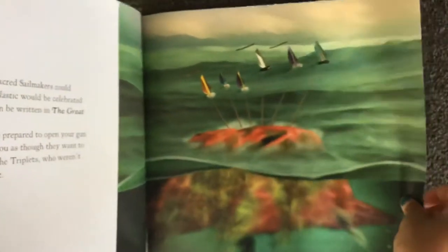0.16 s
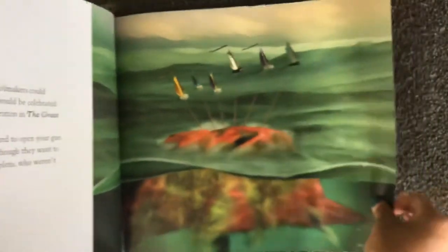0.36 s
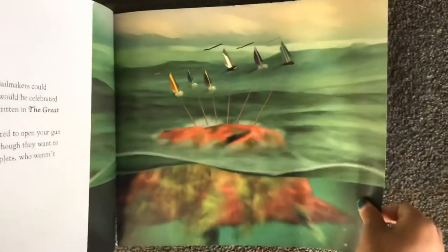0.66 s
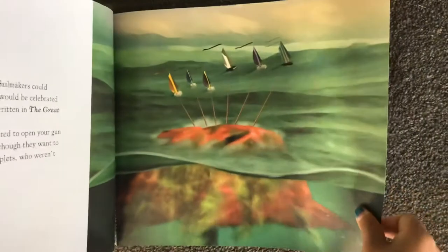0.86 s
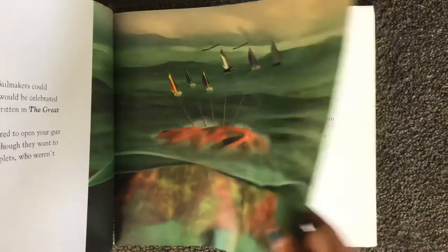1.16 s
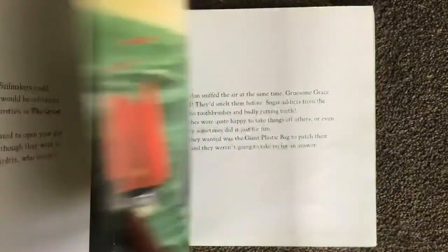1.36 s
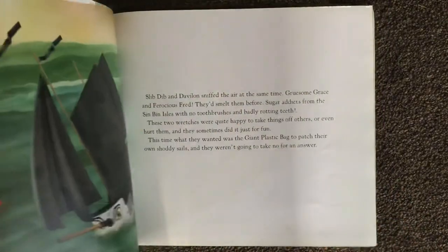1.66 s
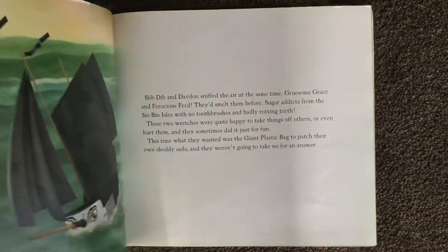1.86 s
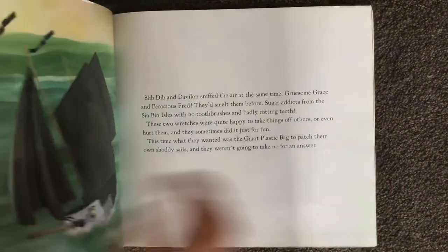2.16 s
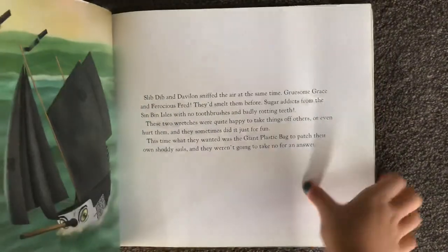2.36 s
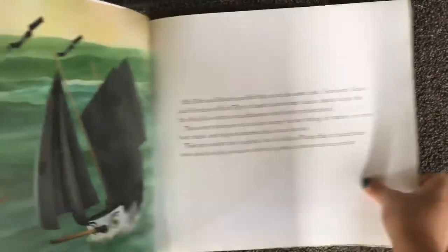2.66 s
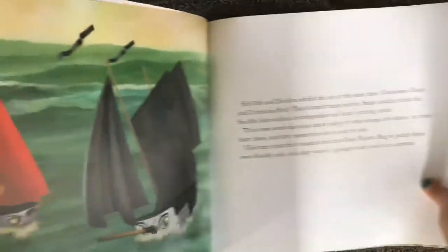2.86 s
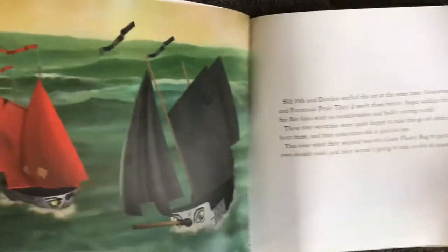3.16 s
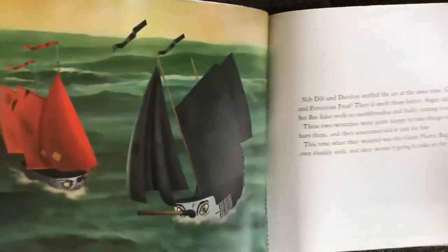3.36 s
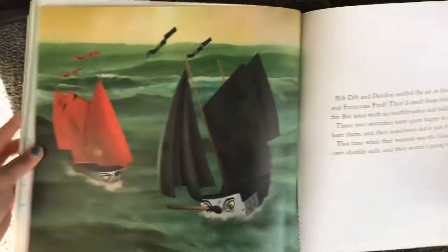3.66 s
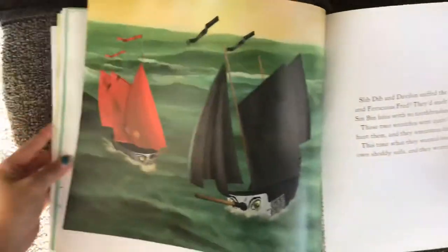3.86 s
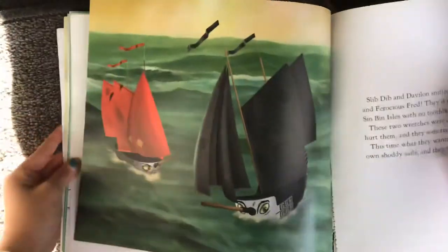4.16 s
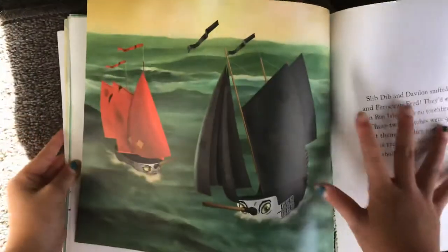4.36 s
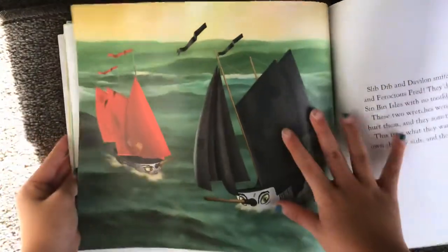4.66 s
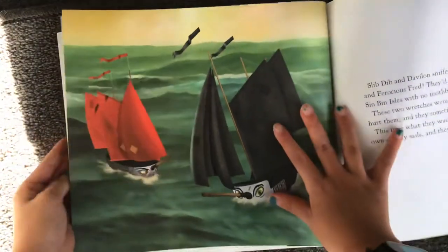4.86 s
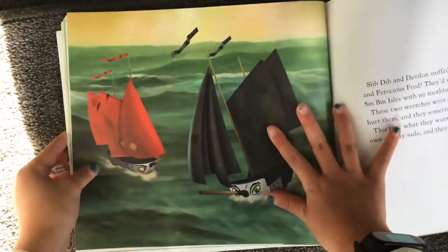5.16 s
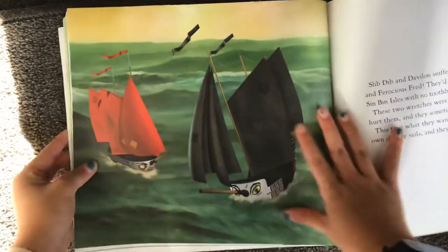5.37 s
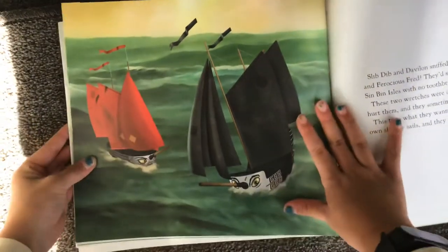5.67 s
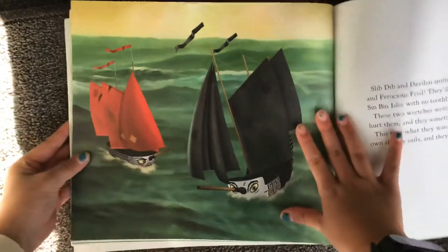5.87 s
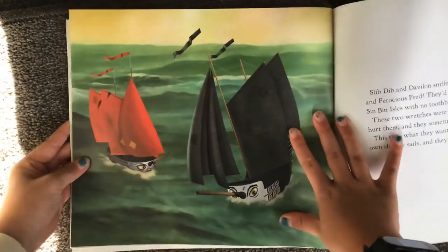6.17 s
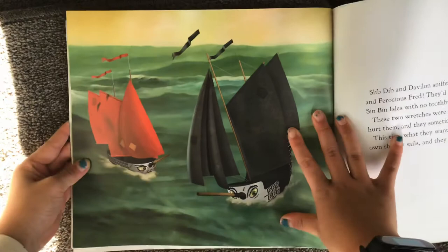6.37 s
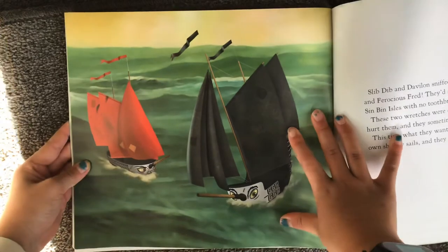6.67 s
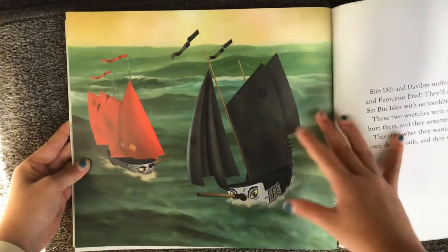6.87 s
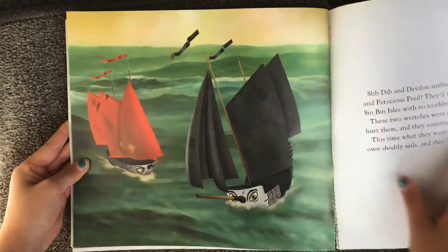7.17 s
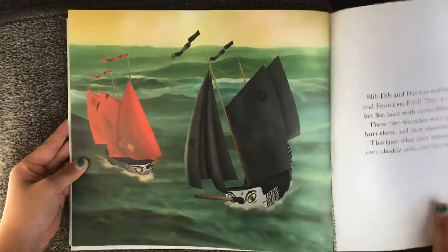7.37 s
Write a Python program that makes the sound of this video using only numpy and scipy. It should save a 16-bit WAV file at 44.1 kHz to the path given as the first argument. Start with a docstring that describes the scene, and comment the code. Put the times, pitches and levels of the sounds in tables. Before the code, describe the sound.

Close by in a quiet room, a fingertip drags up the corner of a glossy book page with small gritty squeaks. The stiff sheet creaks, crackles, snaps over and lands softly. The large book then slides over carpet with a faint grainy hiss and a few dull bumps. A palm presses and smooths the page with brief creaks and swishes, ending in light taps.

```python
"""A large picture-book page buckles, snaps over and lands, close by, on a carpet in a quiet room.
A finger drags the glossy corner up in stick-slip squeaks and creaks. Each slip or snap is a pulse
coloured by the sheet's resonances; snaps also thud the stack of pages below.
The book is then slid along the carpet, gripped, and smoothed flat by a palm:
grainy friction noise in strokes that swell, hold and stop."""
import sys
import numpy as np
from scipy import signal
from scipy.fft import rfft, irfft, next_fast_len
from scipy.io import wavfile
from scipy.ndimage import uniform_filter1d

SR = 44100
rng = np.random.default_rng(int(sys.argv[2]) if len(sys.argv) > 2 else 0)


def master_out(mix):
    """Clip the mix to full scale and print it as 16-bit PCM to the path in sys.argv[1]."""
    frames = np.transpose(np.atleast_2d(mix))
    ceiling = np.clip(frames, -1, 1)
    pcm = np.round(ceiling * 32767).astype(np.int16)
    wavfile.write(sys.argv[1], SR, pcm)


N = 332073
FFT_SIZE = 8192
TIME_S = np.arange(N) / SR
BIN_HZ = np.maximum(np.fft.rfftfreq(FFT_SIZE, 1 / SR), 1)
LEAD_S = 0.006   # build-up ahead of each pulse
LANDING_S = 1.62   # the turned page comes to rest


def from_db(db):
    """Decibels to gain."""
    return 10 ** (np.asarray(db) / 20)


def unit_rms(x):
    """Scale to rms 1."""
    return x / np.sqrt(np.mean(x ** 2) + 1e-20)


def unit_energy(x):
    """Scale to energy 1."""
    return x / np.sqrt(np.sum(x ** 2) + 1e-20)


def spectrum_db(points, hz=BIN_HZ):
    """Interpolate (freq_hz, gain_db) points over log frequency."""
    freq_hz, gain_db = np.transpose(points)
    return np.interp(np.log(np.maximum(hz, 1)), np.log(freq_hz), gain_db)


def resonance_db(centre_hz, q):
    """Spectrum of one damped resonance."""
    return -10 * np.log10(1 + q ** 2 * (BIN_HZ / centre_hz - centre_hz / BIN_HZ) ** 2)


def coloured(x, spectrum):
    """Filter by a spectrum; rms 1."""
    size = next_fast_len(N)
    gain = from_db(spectrum_db(spectrum, np.fft.rfftfreq(size, 1 / SR)))
    return unit_rms(irfft(rfft(x, size) * gain, size)[:N])


def drift(rate_hz):
    """Ramps between unit-normal random values."""
    return np.interp(TIME_S * rate_hz, np.arange(FFT_SIZE), rng.standard_normal(FFT_SIZE))


def add(out, start_s, sound):
    """Mix a sound in at start_s."""
    at = max(round(start_s * SR), 0)
    out[at:at + len(sound)] += sound[:max(N - at, 0)]


# Room air: freq_hz, gain_db
AIR_SPECTRUM = [(15, -66), (25, -44.5), (53, -2.5), (74, 2), (114, -9.5), (145, -12.5), (285, -22.5),
                (476, -33), (695, -25.5), (1160, -30), (2990, -33), (3430, -37), (5570, -38), (16000, -56)]

def room_air(level_db=-71.5):
    """Still air: steady, low noise."""
    return from_db(level_db) * coloured(rng.standard_normal(N), AIR_SPECTRUM)


def room(x, wet_db=-31.0, t60_s=0.52, predelay_s=0.004):
    """Add the carpeted room's faint, short tail."""
    t = TIME_S[:2 * FFT_SIZE]
    tail = rng.standard_normal(len(t)) * from_db(-60 * t / t60_s) * (t > predelay_s)
    tail = signal.sosfilt(signal.butter(1, 6000, fs=SR, output="sos"), tail)
    return x + from_db(wet_db) * signal.fftconvolve(x, unit_energy(tail))[:N]


def friction(spectrum, grain_db, flutter_db):
    """Tiny fibre contacts of uneven size under wavering pressure."""
    grains = rng.standard_normal(N) * from_db(grain_db * np.minimum(rng.exponential(1, N), 5))
    return coloured(grains, spectrum) * from_db(flutter_db * drift(70))


def stroke(start_s, length_s, attack_s=0.012, release_s=0.014):
    """Speed of one stroke: attack, hold, release."""
    attack = (1 + np.tanh((TIME_S - start_s) / (2 * attack_s))) / 2
    release = (1 - np.tanh((TIME_S - start_s - length_s) / (2 * release_s))) / 2
    return attack * release


# Rumble envelope, before trim: time_s, level_db
FLEX_LEVELS = [(0.0, -59.5), (0.48, -70.5), (0.84, -67.5), (1.01, -67), (1.38, -69.5), (2.03, -75),
               (2.98, -61), (3.63, -68), (4.07, -65.5), (4.28, -68.5), (5.98, -66.5), (6.31, -70.5),
               (6.71, -77), (7.53, -69.5)]
# Rumble colour: freq_hz, gain_db
FLEX_SPECTRUM = [(50, -31.5), (100, 2.5), (160, 0), (280, 1.5), (450, -3), (700, -11.5), (1400, -32.5)]

def book_flex(trim_db=-0.5):
    """The book rumbles as it flexes in the hands."""
    level_db = np.interp(TIME_S, *np.transpose(FLEX_LEVELS))
    return from_db(level_db + trim_db) * friction(FLEX_SPECTRUM, grain_db=4.5, flutter_db=3.5)


# Lifts and grips, before trim: start_s, length_s, level_db
LIFT_STROKES = [(-0.003, 0.056, -47), (0.06, 0.31, -54), (0.415, 0.15, -58), (.55, 0.083, -59.5),
                (0.756, 0.2, -62), (0.82, 0.073, -56), (1.11, 0.068, -66.5), (1.255, 0.039, -62.5),
                (1.329, 0.14, -69.5)]
# Paper on paper: freq_hz, gain_db
LIFT_SPECTRUM = [(200, -27.5), (550, -12.5), (950, -6.5), (1350, -13.5), (1750, 0.5), (2300, -2),
                 (2900, -2.5), (3450, -11), (3900, -10.5), (4350, -14.5), (5100, -9.5), (5800, -15),
                 (7200, -21.5), (8100, -18.5), (8900, -18), (9400, -27.5), (11500, -24), (16000, -26.5)]

def sheet_lift(trim_db=-4.0):
    """Sheet whispers over sheet as it is lifted or gripped."""
    envelope = sum(from_db(db) * stroke(start_s, length_s) for start_s, length_s, db in LIFT_STROKES)
    return from_db(trim_db) * envelope * friction(LIFT_SPECTRUM, grain_db=5.0, flutter_db=3.0)


# Hand strokes and the push over the carpet, before trim: start_s, length_s, drag_db, swish_db, hiss_db
RUB_STROKES = [(1.774, 0.1, -64.5, -68.5, -83), (1.892, 0.16, -72, -64.5, -81),
               (2.081, 0.17, -61.5, -60, -80), (2.293, 0.15, -60.5, -58, -78), (2.494, 0.16, -57, -68, -74),
               (2.71, 0.31, -58.5, -62.5, -62.5), (3.012, 0.47, -58, -63.5, -63.5),
               (3.481, 0.71, -57.5, -63.5, -63.5), (4.24, 0.12, -67, -63.5, -72),
               (4.38, 0.2, -67.5, -71, -76.5), (4.63, 0.075, -60, -63, -73), (4.694, 0.13, -61.5, -66, -85),
               (4.865, 0.18, -64, -62.5, -81), (5.03, 0.28, -72, -72.5, -92),
               (5.511, 0.26, -68, -66, -69.5), (5.902, 0.071, -68.5, -66, -84),
               (5.966, 0.16, -64, -60, -68.5), (6.231, 0.16, -79, -77, -83),
               (6.985, 0.4, -84, -75.5, -76.5), (7.473, 0.089, -81, -70.5, -76)]
# Resting hands, before trim: drag_db, swish_db, hiss_db
RUB_FLOOR_DB = [-84.5, -79.5, -87.5]
# Cover drag, skin swish, fibre hiss: freq_hz, gain_db
DRAG_SPECTRUM = [(150, -7.5), (300, 0), (450, 0.5), (700, -3.5), (950, 1), (1600, -3.5), (2400, -7.5),
                 (4000, -20), (9000, -41)]
SWISH_SPECTRUM = [(700, -27.5), (1400, -6), (2000, -3), (3000, 0.5), (3800, -2.5), (4800, -1), (5600, -8),
                  (9000, -13.5), (16000, -23.5)]
HISS_SPECTRUM = [(3000, -31), (5500, -4), (7000, -2), (8500, 0), (10500, -4.5), (13000, -4), (16000, -6.5)]

def rubbing(drag_trim_db=-3.5, swish_trim_db=-3.0, waver_db=0.19):
    """The cover drags on the carpet, skin swishes over the page, fibres hiss."""
    strokes = sum(np.outer(from_db(levels_db), stroke(start_s, length_s))
                  for start_s, length_s, *levels_db in RUB_STROKES)
    strokes *= from_db(waver_db * drift(9))
    drag, swish, hiss = np.hypot(strokes, from_db(RUB_FLOOR_DB)[:, None])
    cover = from_db(drag_trim_db) * drag * friction(DRAG_SPECTRUM, grain_db=4.5, flutter_db=2.0)
    skin = from_db(swish_trim_db) * swish * friction(SWISH_SPECTRUM, grain_db=3.0, flutter_db=2.5)
    fibres = hiss * friction(HISS_SPECTRUM, grain_db=1.0, flutter_db=1.0)
    return cover + skin + fibres


# Light strokes on the gloss, silent past end_s: start_s, fastest_s, end_s, level_db, centre_hz, q
SKIM_STROKES = [(-.02, .04, .16, -54.5, 2850, 7), (0.417, 0.474, 0.59, -68.5, 5100, 6.9),
                (6.99, 7.135, 6.4, -74.5, 2920, 10), (2.704, 2.802, 2.9, -54, 13700, 1.5),
                (2.99, 3.04, 3.4, -59, 14800, 1.2), (3.3, 4.1, 4.185, -63, 8500, 2.2),
                (3.2, 4.08, 3.7, -64.5, 14800, 4), (3.503, 3.87, 3.96, -65, 1680, 4.4),
                (3.818, 3.85, 3.96, -59, 4550, 11), (4.25, 4.373, 4.4, -62.5, 11200, 3.4),
                (4.22, 4.29, 4.38, -63, 4500, 6), (7.09, 7.147, 7.27, -68, 13700, 3)]

def finger_skims():
    """A skimming finger gives a band of noise that follows its speed."""
    out = np.zeros(N)
    for start_s, fastest_s, end_s, level_db, centre_hz, q in SKIM_STROKES:
        speed = np.sin(np.pi / 2 * np.interp(TIME_S, [start_s, fastest_s, end_s], [0, 1, 0]))
        band = np.column_stack([BIN_HZ, resonance_db(centre_hz, q)])
        out += from_db(level_db) * speed * friction(band, grain_db=2.5, flutter_db=1.5)
    return out


# Squeal: start_s, end_s, first_hz, last_hz, level_db
SQUEAL = (1.914, 1.953, 885, 965, -56)
# Harmonics 1-5: gain_db
SQUEAL_HARMONICS_DB = [-3.5, -14, -3, 0, -10]

def squeal(waver_share=0.022):
    """A contact's quick slips lock into a short, rising, hoarse tone."""
    start_s, end_s, first_hz, last_hz, level_db = SQUEAL
    glide_hz = np.interp(TIME_S, [start_s, end_s], [first_hz, last_hz])
    pitch_hz = glide_hz * (1 + waver_share * drift(500))
    phase = 2 * np.pi * np.cumsum(pitch_hz) / SR
    tone = sum(from_db(db) * np.sin(k * phase) for k, db in enumerate(SQUEAL_HARMONICS_DB, 1))
    envelope = np.sin(np.pi * np.interp(TIME_S, [start_s, end_s], [0, 1]))
    return from_db(level_db) * envelope * unit_rms(tone)


def blow(colour_db, ring_db, t60_s, give_db, give_s, ripple_hz, swell_s=0.00078):
    """Paper gives, lets go in one pulse and rings densely; energy of 5 ms at rms 1."""
    # Broad colour swells into the pulse; narrow peaks ring after it.
    cepstrum = irfft(np.log(from_db(colour_db)))
    cepstrum *= 1 + np.tanh(np.fft.fftfreq(FFT_SIZE) * FFT_SIZE / SR / swell_s)
    t = TIME_S[:FFT_SIZE] - LEAD_S
    give_noise, ring_noise = rng.standard_normal((2, FFT_SIZE))
    waves = from_db(give_db) * unit_energy(give_noise * np.exp(-np.abs(t) / give_s))
    waves += from_db(ring_db) * unit_energy(ring_noise * (t > 0) * from_db(-60 * t / t60_s))
    waves[np.searchsorted(t, 0)] = 1   # the pulse
    # Whiten: reflections add only fine ripples to the contact's colour.
    ripples = rfft(waves)
    ripples /= np.sqrt(uniform_filter1d(np.abs(ripples) ** 2, int(ripple_hz * FFT_SIZE / SR) + 1))
    sound = irfft(np.exp(rfft(cepstrum)) * ripples)[:FFT_SIZE // 2]
    return unit_energy(sound) * np.sqrt(0.005 * SR)


def thud(centre_hz, t60_s, q, skirt_db, ring_db):
    """The page stack answers a soft blow with one broad, damped resonance."""
    soft_contact_db = skirt_db * np.log10(1 + (BIN_HZ / (3 * centre_hz)) ** 2)
    colour_db = resonance_db(centre_hz, q) + soft_contact_db
    return blow(colour_db, ring_db, t60_s, give_db=2.0, give_s=0.001, ripple_hz=250)


# Soft blows on the book: start_s, level_db, centre_hz, t60_s
SOFT_BLOWS = [(.566, -39, 235, 0.13), (.584, -47, 120, 0.2), (.967, -42, 200, 0.12),
              (1.125, -36, 171, 0.086), (1.141, -41.5, 120, 0.15), (1.6255, -43.5, 1316, 0.029),
              (1.628, -41, 636, 0.077), (2.087, -45, 127, 0.13), (2.793, -53, 440, 0.08),
              (3.699, -51.5, 654, 0.021), (3.981, -53.5, 900, 0.018), (4.176, -37, 305, 0.065),
              (4.924, -48, 340, 0.23), (4.977, -45, 473, 0.051), (5.35, -52.5, 330, 0.064),
              (5.5, -55, 119, 0.06), (5.588, -52, 100, 0.083), (6.099, -49, 299, 0.089),
              (7.12, -59, 1159, 0.04), (7.128, -46, 278, 0.13)]

def thumps():
    """Fingers, palm and the landing page thud without a crack."""
    out = np.zeros(N)
    for start_s, level_db, centre_hz, t60_s in SOFT_BLOWS:
        thump = thud(centre_hz, t60_s, q=1.9, skirt_db=-36.5, ring_db=4.0)
        add(out, start_s - LEAD_S, from_db(level_db) * thump)
    return out


# One slip of the stiff sheet: freq_hz, gain_db
PAPER_SPECTRUM = [(40, -37.5), (80, -19), (200, -19), (550, -15.5), (950, -13.5), (1350, -13.5), (1620, 2),
                  (1850, 3.5), (2750, -3.5), (3500, -9), (4600, -11.5), (6200, -21.5), (9000, -29),
                  (16000, -34.5)]
# Sheet resonance through the turn: time_s, main_hz, clearness_share
SHEET_TRACK = [(0, 1760, 0), (.75, 1796, 0.53), (.89, 1654, 1), (.97, 1620, 0.93), (1.13, 1580, 1),
               (1.7, 1590, 0.11), (7.53, 1587, 0)]
# Peaks and hollows of the free sheet: ratio_to_main, gain_db
FREE_MODES = [(.33, 4), (.68, -6.5), (1.03, 2.5), (1.72, -10), (2.15, 4), (2.6, -6.5), (2.97, 7.5),
              (3.42, -5), (3.85, 7.5), (5, 7.5), (5.6, 2)]

def paper_colour_db(time_s, body_db, treble_db, mode_width_share=0.092):
    """Broad contacts add body, sharp ones treble; a freer sheet rings lower and clearer."""
    times_s, track_hz, clearness = np.transpose(SHEET_TRACK)
    main_hz = np.interp(time_s, times_s, track_hz)
    shifted_hz = BIN_HZ * track_hz[0] / main_hz
    contact = [(90, body_db / 2), (300, body_db), (1150, body_db), (1700, 0.012), (2400, 0.0023),
               (5500, treble_db), (14000, 1.215 * treble_db)]
    modes_db = sum(db * np.exp(-(np.log(BIN_HZ / (ratio * main_hz)) / mode_width_share) ** 2)
                   for ratio, db in FREE_MODES)
    modes_db *= np.interp(time_s, times_s, clearness)
    return spectrum_db(PAPER_SPECTRUM, shifted_hz) + spectrum_db(contact, shifted_hz) + modes_db


def disperse(sound, travel_s):
    """Bending waves carry lows more slowly; travel_s is at 1 kHz, and 2 kHz stays on time."""
    phase = 2 * np.pi * travel_s * (2 * np.sqrt(1000 * BIN_HZ) - BIN_HZ / np.sqrt(2))
    return irfft(rfft(sound, FFT_SIZE) * np.exp(-1j * phase))[:len(sound)]


def slip_force(period_s, scrape, cycle_share=0.31, longest_s=0.0022, reference_s=0.0059):
    """A slip lasts a share of its cycle: quick ones pluck cleanly, slow ones may scrape."""
    t = TIME_S[:FFT_SIZE // 16]
    slip_s = min(cycle_share * period_s, longest_s)
    grit = rng.standard_normal(len(t)) * np.exp(-(t / slip_s) ** 2)
    force = scrape * (period_s / reference_s) ** 2 * unit_energy(grit)
    force[0] = 1
    return force


def stick_slip(pluck, start_s, end_s, rates_hz, levels_db, scrape, jitter_share, uneven_db):
    """Nearly regular slips pluck the sheet; rate and level ramp from first to last."""
    out, time_s = np.zeros(N), start_s
    while time_s <= end_s:
        period_s = 1 / np.interp(time_s, [start_s, end_s], rates_hz)
        level_db = np.interp(time_s, [start_s, end_s], levels_db) + uneven_db * rng.standard_normal()
        scraped = np.convolve(pluck, slip_force(period_s, scrape))
        slip = unit_energy(scraped) * np.linalg.norm(pluck)   # same energy, spread out
        add(out, time_s - LEAD_S, from_db(level_db) * slip)
        time_s += period_s * np.exp(jitter_share * rng.standard_normal())
    return out


# Slow slip runs:
# start_s, end_s, first_rate_hz, last_rate_hz, first_db, last_db, body_db, treble_db, scrape_gain
CREAK_RUNS = [(.5515, 0.573, 155, 130, -58, -59, 7, -13, 0),
              (0.591, 0.618, 260, 170, -51.5, -56, 6, 0, 0.2),
              (0.7555, 0.79, 163, 190, -56, -57, 2, -15, 0.14),
              (0.798, 0.834, 360, 230, -63, -54, 7, -9, 0.2),
              (0.8383, 0.896, 278, 175, -48, -47.5, 8.5, 0.5, .1),
              (2.372, 2.429, 164, 120, -56.5, -63, 5, 10, 0.74),
              (2.441, 2.494, 101, 86, -53.5, -47, 9, 11.5, .5),
              (2.5028, 2.539, 126, 99, -42.5, -40.5, 11.5, 7, 0.4),
              (2.5508, 2.591, 87, 63, -43, -50, 15, 9, 0.5),
              (5.342, 5.417, 64, 32, -66.5, -65.5, 12, 19, 0.22),
              (5.472, 5.537, 140, 190, -64.5, -48.5, 26, 15, 0.52),
              (5.547, 5.602, 71, 79, -49, -46, 24.5, 9, 0.14)]
# Palm contact, added to the paper colour: freq_hz, gain_db
PALM_SPECTRUM = [(150, -1), (480, 3.5), (850, -2), (1500, 1), (1950, -3), (3000, 1), (5200, -3),
                 (6300, -5.5), (9000, -1.5)]

def slow_creaks():
    """Slow slip runs judder: first the lifted sheet's corner ticks, later a hard-pressed thumb and palm judder
    over the page; each slip disperses into a falling chirp."""
    out = np.zeros(N)
    for start_s, end_s, *rates_hz, first_db, last_db, body_db, treble_db, scrape in CREAK_RUNS:
        colour_db = paper_colour_db(start_s, body_db, treble_db) + spectrum_db(PALM_SPECTRUM)
        pluck = blow(colour_db, ring_db=-13.5 + 22 * scrape, t60_s=0.024,
                     give_db=-9, give_s=0.00016, ripple_hz=508)
        pluck = disperse(pluck, travel_s=0.0014)
        out += stick_slip(pluck, start_s, end_s, rates_hz, [first_db, last_db], scrape,
                          jitter_share=0.016, uneven_db=1.0)
    return out


# Quick slip runs: start_s, end_s, first_rate_hz, last_rate_hz, level_db, body_db, treble_db
SQUEAK_RUNS = [(0.04, 0.045, 670, 500, -46, -3, -0.5), (0.052, 0.06, 720, 640, -45, 5, 0),
               (.071, 0.092, 520, 410, -44, 6.5, 1), (0.1007, 0.1183, 520, 600, -40, 4.5, -1),
               (0.13, 0.144, 720, 500, -39, 6, 0.5), (0.17, 0.1776, 570, 410, -36.5, 3.5, 0.5),
               (0.1938, .2062, 440, 375, -40.5, 3, -2), (0.2165, 0.2332, 605, 380, -40, 5, 0.5),
               (0.237, 0.2457, 420, 440, -40, 6, -1), (0.252, 0.271, 560, 470, -42, 3.5, 0.5),
               (0.279, 0.297, 430, 510, -46, 3, 0), (0.311, 0.323, 600, 440, -54, 4, -2),
               (2.788, 2.802, 460, 415, -51, 24.5, 11), (3.825, 3.84, 550, 530, -53, 12, 12),
               (3.842, 3.853, 560, 370, -45, 12, 6)]
# Fingertip contact, added to the paper colour: freq_hz, gain_db
FINGERTIP_SPECTRUM = [(200, 0), (700, 1), (1000, 2), (1330, -5), (1550, 3.5), (1900, 0.5), (2900, 4),
                      (3500, -3), (3950, 1.5), (4600, 3.5), (5600, 1), (6400, 0.5), (7800, -1.5),
                      (8800, 8.5), (9900, -2), (11400, 3), (14000, 0)]

def finger_squeaks(fade_db=1.0):
    """A fingertip breaks loose on the gloss, slips in gritty plucks and sticks again."""
    out = np.zeros(N)
    for start_s, end_s, *rates_hz, level_db, body_db, treble_db in SQUEAK_RUNS:
        colour_db = paper_colour_db(start_s, body_db, treble_db) + spectrum_db(FINGERTIP_SPECTRUM)
        pluck = blow(colour_db, ring_db=-10, t60_s=0.021, give_db=-11.5, give_s=0.0001, ripple_hz=1100)
        pluck = disperse(pluck, travel_s=0.00061)
        levels_db = [level_db + fade_db / 2, level_db - fade_db / 2]
        out += stick_slip(pluck, start_s, end_s, rates_hz, levels_db,
                          scrape=2.1, jitter_share=0.08, uneven_db=2.3)
    return out


def crack(time_s, body_db, treble_db):
    """One sharp release of the paper: clean while it hangs free, buzzing once on the stack."""
    buzz_db = 7.5 * (time_s > LANDING_S)
    pulse = blow(paper_colour_db(time_s, body_db, treble_db), ring_db=-6 + buzz_db, t60_s=0.018,
                 give_db=-3 + buzz_db, give_s=0.0005, ripple_hz=1100)
    return disperse(pulse, travel_s=0.00078)


# Tick runs: start_s, end_s, typical_db
CRACKLE_RUNS = [(0.911, 0.96, -55), (1.029, 1.05, -64), (1.137, 1.18, -48), (2.088, 2.116, -57),
                (2.699, 2.787, -58), (4.099, 4.147, -58.5), (5.953, 6.104, -81)]

def paper_crackles(rate_hz=110, uneven_db=4.5):
    """Bent or pressed paper ticks, unevenly in size and spacing."""
    out = np.zeros(N)
    for start_s, end_s, typical_db in CRACKLE_RUNS:
        flat_db = 10.5 * (start_s > LANDING_S)   # on the stack the resonance stands out less
        time_s = start_s
        while time_s < end_s:
            tick = crack(time_s, body_db=7.0 + flat_db, treble_db=-0.5 + flat_db / 2)
            add(out, time_s - LEAD_S, from_db(typical_db + uneven_db * rng.standard_normal()) * tick)
            time_s += (0.5 + rng.random()) / rate_hz
    return out


# Buckles, edge flicks, nail ticks: start_s, level_db, body_db, treble_db, thud_relative_db
PAGE_SNAPS = [(0.3548, -32.5, -0.5, 6.5, -19.5), (.394, -59, -1, 11, 5), (.417, -65, -1, 11, -8),
              (0.626, -46, -1, 4, -6), (0.6314, -53, 2, -6, -8), (0.65, -44, 5, 6, -5.5),
              (0.654, -53, 8, -2, -3), (0.6739, -44, 4, 6, -7), (0.6782, -48.5, 5, -4, -7),
              (0.6956, -42.5, 2, 5.5, -6), (0.6992, -51, 14, 5, -11), (.722, -61, -2, -10, -17),
              (0.731, -51, -9, -2, 0.5), (.748, -49.5, 2, 0, -12), (0.8667, -41, 5, 0, -20),
              (0.8801, -35, 3.5, 0, -18), (0.9042, -35, 3.5, 6.5, -11.5), (.916, -51, 12, -10, -15),
              (0.9228, -50, 13, -8, -18), (.932, -45.5, 10, -1, -19), (0.9437, -44.5, 9, 2, -8),
              (0.965, -34.5, 9, 9.5, -6.5), (0.9691, -38.5, 9.5, -2, -7.5), (.99, -49, 13, 1.5, -19),
              (1, -45.5, 13, -2.5, -20), (1.067, -55, 8, 2, -20), (1.0765, -42, 12, -3, -34),
              (1.0995, -36, 11, -3.5, -19), (1.116, -38, 7, -4, -25), (1.1233, -24.5, 9.5, -1, -8),
              (1.13, -37, 1, 0, -2), (1.138, -43, 9, -5, -12), (1.1404, -38, 10, -2, -11),
              (1.1467, -40, 10, -5, -9), (1.1544, -36.5, 5, -5, -2), (1.1729, -37, 11, -6.5, -4),
              (1.179, -49, 7, -2, -9), (1.362, -63.5, 6, 4, -18), (1.671, -54, 17, 7.5, -5),
              (1.725, -59.5, 5, 14, -14), (1.7565, -60, 14, 0, -12), (1.762, -47, 18.5, 8.5, -13),
              (2.083, -47.5, 19.5, 19, -18), (2.105, -50, 26, 18, -5), (2.1848, -44, 11, 23.5, -15),
              (2.1875, -42.5, 19, 18.5, -7.5), (2.6263, -54.5, 3.5, 13, -15), (2.683, -54, 18, 5, -20),
              (2.797, -48, 19, -2, 2), (2.97, -46.5, 23, 7, -7), (3.228, -58, 8, 5, -10),
              (3.305, -52.5, 11, -15, -9), (3.5075, -37, 9.5, 4, -15.5), (3.851, -42, 15, 12, -9),
              (4.16, -52.5, 12, 4, -12), (4.959, -52, 27, -6, 0.5), (4.9677, -43, 16, -11, -21),
              (4.973, -44.5, 16, 7, -14), (4.978, -44, 11, -1, -3), (4.993, -47.5, 20, -3, -11),
              (4.9998, -55.5, 10, 10, -10), (5.157, -51, -7, 65, -20), (5.2408, -41.5, 16.5, 18.5, -25),
              (5.458, -58.5, -8, 18, 3.5), (5.816, -55.5, 15, 11, -3), (5.8385, -53, 14, 11, 0),
              (5.942, -62, 7, 16, -14), (5.991, -55.5, 2, 15, -3), (6.048, -57.5, 8, 21, -10),
              (7.0105, -52.5, 8, 23.5, -5), (7.0373, -49.5, 1, 23.5, -2.5), (7.0886, -58, 2, 32, 8),
              (7.125, -59, 16, 6, -5), (7.293, -69, 21, 10, -7)]

def page_snaps(warning_s=0.0099, thud_lag_s=0.001, rebound_s=0.005):
    """The sheet ticks as it gives, cracks, shakes the stack and rebounds once, weaker and duller."""
    out = np.zeros(N)
    for start_s, level_db, body_db, treble_db, thud_relative_db in PAGE_SNAPS:
        warning = from_db(-24.5) * crack(start_s, body_db, treble_db)
        snap = crack(start_s, body_db, treble_db)
        stack = thud(centre_hz=345, t60_s=0.065, q=1.2, skirt_db=-30.5, ring_db=1.0)
        stack *= from_db(thud_relative_db)
        rebound = from_db(-20) * crack(start_s, body_db, treble_db - 7)
        for lag_s, sound in [(-warning_s, warning), (0, snap), (thud_lag_s, stack), (rebound_s, rebound)]:
            add(out, start_s + lag_s - LEAD_S, from_db(level_db) * sound)
    return out


def scene():
    """Still air, dry friction, and contacts with a room tail; mono."""
    air = room_air()
    contacts = (page_snaps() + paper_crackles() + thumps()
                + finger_squeaks() + slow_creaks() + squeal())
    sliding = rubbing() + sheet_lift() + book_flex() + finger_skims()
    return (air + sliding + room(contacts))[None]


def record(dry, low_cut_hz=45, high_cut_hz=16200):
    """A small microphone loses the deep bass; the top is cut."""
    thin = signal.sosfilt(signal.butter(2, low_cut_hz, "high", fs=SR, output="sos"), dry)
    return signal.sosfilt(signal.ellip(10, 0.1, 70, high_cut_hz, fs=SR, output="sos"), thin)


dry = scene()
out = record(dry)
master_out(out)
```